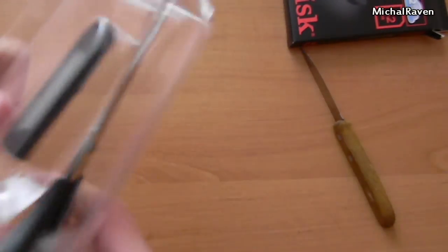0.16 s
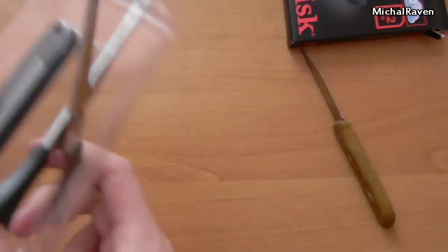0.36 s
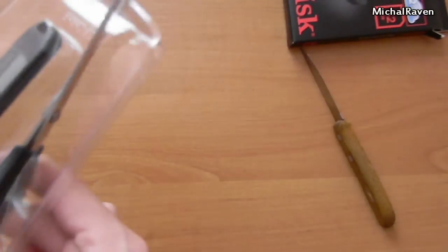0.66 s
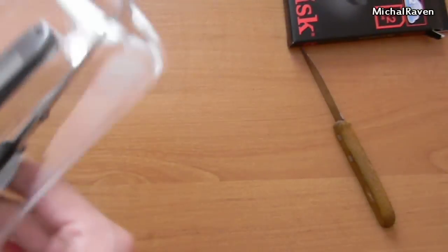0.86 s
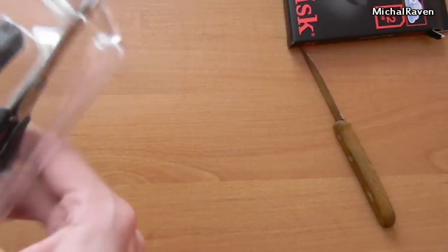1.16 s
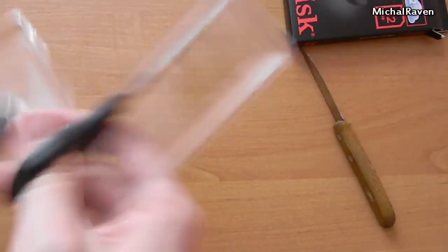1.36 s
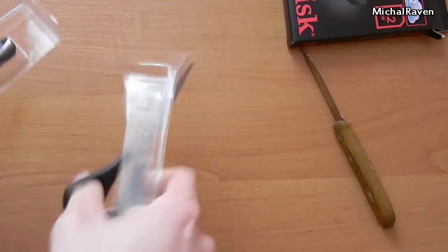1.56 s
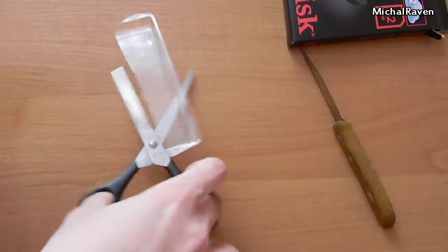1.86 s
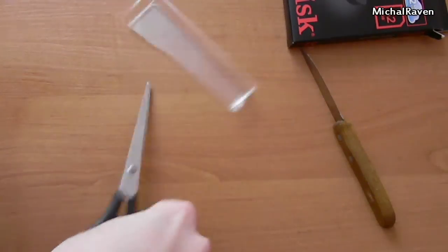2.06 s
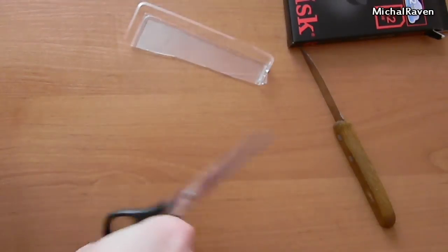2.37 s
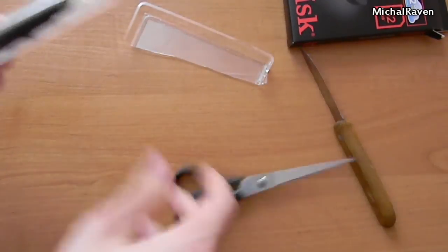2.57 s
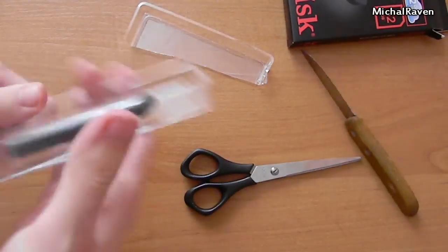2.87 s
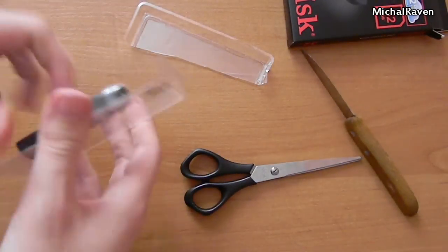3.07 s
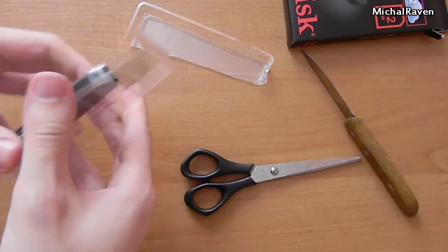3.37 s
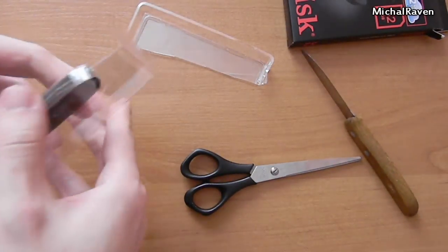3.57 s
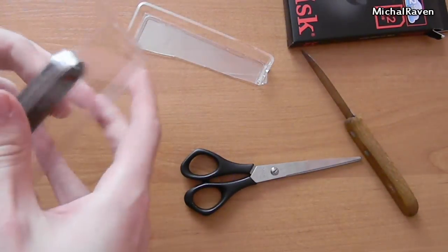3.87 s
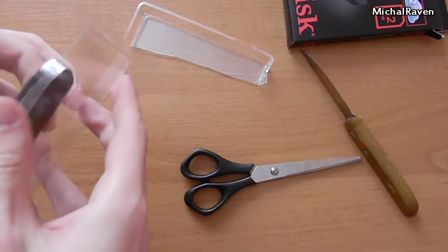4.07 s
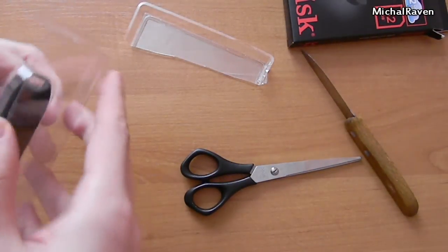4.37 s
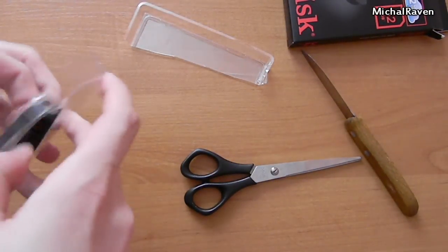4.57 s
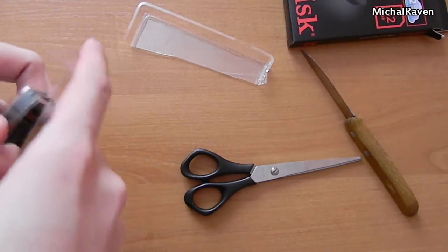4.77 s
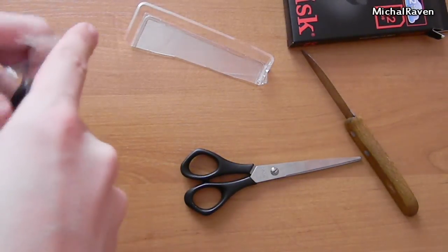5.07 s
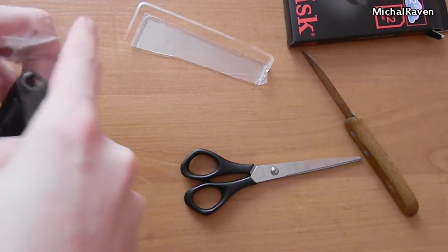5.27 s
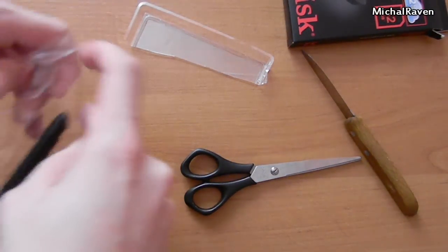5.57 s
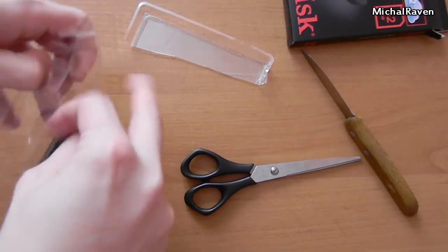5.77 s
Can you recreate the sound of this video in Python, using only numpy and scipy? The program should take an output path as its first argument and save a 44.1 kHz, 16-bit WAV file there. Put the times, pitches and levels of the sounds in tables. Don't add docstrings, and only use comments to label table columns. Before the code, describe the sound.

A close, slightly rough recording in a small room with short bright reflections and faint steady hiss. From 0 to 0.3 s stiff plastic film crackles and snaps under scissors, with hollow knocks of the shell. A quieter stretch of tiny ticks follows, with a small snap at 0.7 s. Cracks build at 1.1 s to a very loud, clipped seam break near 1.3 s, then more snaps around 1.6 to 1.7 s. From 1.8 to 2.3 s a light plastic offcut clatters and slides on the wooden table. At 2.4 s scissors drop, with woody knocks and metallic ringing, bouncing and rocking to rest by about 3 s. Faint creases and ticks fill 3 to 4.3 s. Hand prying then pops sharply at 4.5, 4.9 and 5.2 s, and a thick seam bursts loudly at 5.3 s, with another snap near 5.46 s. Small crackles fade to the end.

```python
import sys
import numpy as np
from scipy import signal
from scipy.fft import rfft, irfft, next_fast_len
from scipy.io import wavfile
from scipy.ndimage import uniform_filter1d, map_coordinates

SR = 44100
rng = np.random.default_rng(int(sys.argv[2]) if len(sys.argv) > 2 else 0)


def magnitude_from_level(level_db):
    exponent = np.asarray(level_db, float) / 20
    return 10 ** exponent


def transcribe(u):
    v = np.clip(np.atleast_2d(u).T, -1, 1)
    q = np.round(v * 32767).astype(np.int16)
    wavfile.write(sys.argv[1], SR, q)


N = 260631
SPAN, TAIL = 4096, 16384


def unit(x):
    return x / np.sqrt(np.mean(x ** 2) + 1e-20)


def along(points, hz):
    f, v = np.transpose(points)
    return np.interp(np.log(hz + 1), np.log(f + 1), v)


def curve(rows, column):
    rows = np.array(rows)
    return np.interp(np.arange(N) / SR, rows[:, 0], rows[:, column], left=-150, right=-150)


def colour(points):
    def response(hz):
        cepstrum = irfft(np.log(magnitude_from_level(along(points, hz))))
        half = len(cepstrum) // 2
        cepstrum[1:half] *= 2
        cepstrum[half + 1:] = 0
        return np.exp(rfft(cepstrum))
    return response


def mode(hz, centre_hz, width_hz):
    return 1j * hz * width_hz / (centre_hz ** 2 - hz ** 2 + 1j * hz * width_hz)


def modes(table):
    return lambda hz: sum((-1) ** k * magnitude_from_level(db) * mode(hz, centre, width)
                          for k, (centre, width, db) in enumerate(table))


def high_pass(hz, corner_hz):
    return 1j * hz / (corner_hz + 1j * hz)


def filtered(x, response):
    n = x.shape[-1]
    m = 2 * next_fast_len(n // 2 + 2048)
    return irfft(rfft(x, m) * response(np.fft.rfftfreq(m, 1 / SR)), m)[..., :n]


def peaked(rows, size):
    return rows / np.sqrt(2 * uniform_filter1d(rows ** 2, size).max(axis=1, keepdims=True))


def placed(rows, times):
    at = np.round(np.asarray(times) * SR).astype(int)[:, None] + np.arange(rows.shape[1])
    return np.bincount(at.ravel(), rows.ravel(), N + rows.shape[1] + SR)[:N]


def grains(rate, spread_db, clump_db):
    clump = magnitude_from_level(clump_db * unit(uniform_filter1d(rng.standard_normal(N), size=500)))
    draw = rng.random((2, N))
    present = draw[0] < rate / SR
    size = magnitude_from_level(-spread_db * np.log(draw[1] + 1e-3))
    return clump * present * size * rng.standard_normal(N)


# frequency in Hz, level in dB per Hz.
HUSH = [(24, -58.5), (40, -43.5), (118, -29), (167, -9.5), (290, 1), (556, -1.5), (2210, -13.5),
        (2440, -23), (4130, -13.5), (5050, -17.5), (12500, -25), (13800, -37), (16000, -64)]


def hush():
    air = magnitude_from_level(-63) * unit(filtered(rng.standard_normal(N), colour(HUSH)))
    whine_hz = 8075
    return air + magnitude_from_level(-94.5) * np.sin(2 * np.pi * whine_hz * np.arange(N) / SR)


# frequency in Hz, time to fall 60 dB in s.
ROOM = [(200, 0.067), (600, 0.21), (1500, 0.38), (4000, 0.25), (10000, 0.23)]
# frequency in Hz, level in dB.
WALLS = [(200, -8.5), (900, 5.5), (2300, 3), (3200, 4.5), (4500, 2), (5400, -1.5), (9000, -0.5),
         (14000, -4.5)]


def tails(count):
    hz, t, z = signal.stft(rng.standard_normal((count, TAIL)), SR, nperseg=256)
    z = z * magnitude_from_level(along(WALLS, hz)[:, None] - 60 * t / along(ROOM, hz)[:, None])
    tail = signal.istft(z, SR, nperseg=256)[1][:, :TAIL]
    first_wall_s = 0.0019
    tail = tail * np.clip(np.arange(TAIL) / SR / first_wall_s - 0.4, 0, 1)
    tail = tail * magnitude_from_level(0.84 * unit(uniform_filter1d(rng.standard_normal(tail.shape), size=130)))
    return tail / np.linalg.norm(tail, axis=1, keepdims=True)


# centre in seconds, level in dB, length in s.
PUFFS = [
    (.0, -44, 0.0087),
    (2.073, -71, 0.099),
    (2.264, -66, 0.042),
    (4.508, -59, 0.025),
    (5.716, -63, 0.1),
]


def puffs():
    s, db, long_s = np.transpose(PUFFS)[:, :, None]
    swell = (magnitude_from_level(db) * np.exp(-((np.arange(N) / SR - s) / long_s) ** 2)).sum(axis=0)
    centre_hz = 110
    return swell * unit(filtered(rng.standard_normal(N), lambda hz: mode(hz, centre_hz, 2 * centre_hz) ** 2))


def hits(s, ms, parts, wet_db, sharp, size=550):
    t = np.arange(SPAN) / SR
    draw = rng.standard_normal((len(s), 2, SPAN))
    spiky = draw[:, 0] * magnitude_from_level(2.4 * draw[:, 1])
    held = np.clip(ms - 1.4, 0.4, 24) / 1000
    onset = np.clip(t / (0.00017 + 0.14 * held), 0, 1)
    click = (t == 0) * np.ones_like(spiky)
    force = spiky * magnitude_from_level(-9 * t / held) * onset + sharp * click
    dry, power = 0, 0
    for db, response in parts:
        near = magnitude_from_level(db) * peaked(filtered(force, response), size=88)
        dry = dry + near
        power = power + np.abs(rfft(near, TAIL + SPAN)) ** 2
    smooth = np.sqrt(np.abs(uniform_filter1d(power, size)))
    sent = 0.25 * rfft(dry, TAIL + SPAN) + 0.9 * smooth
    wet = irfft(sent * rfft(tails(len(s)), TAIL + SPAN))[:, :TAIL]
    return placed(dry, s[:, 0]) + magnitude_from_level(wet_db) * placed(wet, s[:, 0])


# frequency in Hz, level in dB.
FILM = [(300, -50.5), (700, -17), (1500, -3), (2400, -4), (3300, 5), (4400, 8.5), (5500, -2), (7500, -7),
        (11000, -36), (16000, -52)]


def facet(ring_hz, ring_db, wide, body_db=0):
    def response(hz):
        ring = mode(hz, ring_hz, wide * ring_hz) * high_pass(hz, 0.13 * ring_hz)
        ring = ring / (1 + 1j * hz / (2.4 * ring_hz)) ** 2
        return magnitude_from_level(body_db) * colour(FILM)(hz) + magnitude_from_level(ring_db) * ring
    return response


# frequency in Hz, level in dB.
EDGE = [(300, -55), (4500, -22.5), (6500, 7), (9000, 4.5), (12000, -14.5), (15500, -22), (17000, -46)]


def edge(db):
    top_hz = np.maximum(30000 + 950 * db, 5200)
    return lambda hz: -colour(EDGE)(hz) / (1 + 1j * hz / top_hz) ** 3


# peak in seconds,
# crackle in dB, easing in dB per s, rumble over it in dB.
SWELLS = [(.01, -33, 149, -2), (0.198, -38.5, 167, 6), (.32, -50, 32, 1.5), (.76, -54, 55, -26),
          (.96, -32.5, 120, -10), (1.135, -27, 200, -15), (1.3, -17, 200, -10), (1.36, -66, 64, 20),
          (1.45, -32.5, 300, -31), (1.619, -46, 12, -9), (2.51, -17.5, 72, -13), (2.625, -18.5, 102, -6),
          (2.75, -48, 48, -24), (2.92, -31.5, 268, -21), (3.1, -66, 22, 16), (3.46, -65.5, 63, 11),
          (3.662, -44.5, 238.5, -22), (4.07, -50, 247, -9), (4.519, -29.5, 131, -0.5),
          (4.95, -42, 36.5, -3.5), (5.257, -25, 280, -15), (5.4, -46, 64, 16.5), (5.52, -32.5, 137.5, -67),
          (5.74, -61.5, 21, -8)]


def rustle():
    creasing = grains(rate=5000, spread_db=1.3, clump_db=2)
    crackle = unit(filtered(creasing, lambda hz: colour(FILM)(hz) + 0.027 * edge(-30)(hz)))
    rumble = unit(filtered(grains(rate=4300, spread_db=1.0, clump_db=3.2), colour(SHELL)))
    s, db, ease, rumble_db = np.transpose(SWELLS)[:, :, None]
    coarse = np.arange(0, N, 32)
    t = coarse / SR - s
    swell_db_per_s = 452
    surge = magnitude_from_level(db - np.maximum(ease * t, -swell_db_per_s * t))
    hold_db, hold_rumble_db = -67, 2.5
    bright = magnitude_from_level(hold_db) + surge.sum(axis=0)
    hollow = magnitude_from_level(hold_db + hold_rumble_db) + (magnitude_from_level(rumble_db) * surge).sum(axis=0)
    crackle = crackle * np.interp(np.arange(N), coarse, bright)
    rumble = rumble * np.interp(np.arange(N), coarse, hollow)
    return magnitude_from_level(-13.0) * crackle + magnitude_from_level(-10.5) * rumble


# time in seconds, pressure in dB.
SLIDE = [
    [(1.83, -42), (1.95, -51.5), (2.05, -47), (2.12, -45.5), (2.18, -40), (2.205, -50), (2.23, -46),
     (2.29, -57.5), (2.36, -72)],
    [(2.6, -56), (2.66, -40.5), (2.76, -34), (2.85, -37.5), (2.93, -34), (2.97, -47.5), (3.05, -62),
     (3.2, -61.5)],
]
# frequency in Hz, width in Hz, level in dB.
TABLE = [(317.7, 11, 5.5), (700, 45, 0.6), (775, 55, -0.6), (1090, 48, -6), (1550, 40, 0), (1640, 35, 4),
         (2430, 50, -1), (2600, 40, 2), (3600, 190, 2), (4200, 450, 1)]
# frequency in Hz, width in Hz, level in dB.
ROCKING = [(329.4, 20, 4), (720, 70, 0.6), (1633, 90, -11), (2384, 240, -12), (2830, 250, -6),
           (3830, 200, -2.5), (4350, 200, -8.5), (5700, 260, -14)]
HIGH_MODES_DB = [-1, 0]


def slide():
    rub = grains(rate=4900, spread_db=1.5, clump_db=2.5)
    sound = 0
    for pressure, body, high_db in zip(SLIDE, [TABLE, ROCKING], HIGH_MODES_DB):
        low = unit(filtered(rub, modes([m for m in body if m[0] <= 1000])))
        high = unit(filtered(rub, modes([m for m in body if m[0] > 1000])))
        sound = sound + magnitude_from_level(curve(pressure, column=1)) * (low + magnitude_from_level(high_db) * high)
    waver, waver_s = 0.022, 0.04
    drift = waver * unit(uniform_filter1d(rng.standard_normal(N), size=round(waver_s * SR)))
    lag = np.cumsum(drift)
    return map_coordinates(sound, [np.arange(N) + lag - uniform_filter1d(lag, size=9000)])


# start in seconds, peak in dB, table knock in dB, steel in dB, length in ms.
DROPS = [(2.3973, -6, -11.5, -10, 3.47), (2.478, -20, -11, -9.5, 7.2), (2.4874, -5, -10.5, -9.5, 4.04),
         (2.4931, -4, -6, -15, 5), (2.507, -14, -8, -16.5, 11.4), (2.6072, -19, -6, -11, 3.8),
         (2.612, -8, -8.5, -6.5, 4), (2.584, -27.5, -20, -0.5, 3), (2.626, -17, -17, -14.5, 4.87),
         (2.633, -18.5, -15, -16, 5), (2.6685, -19.5, -18, -19.5, 5), (2.6715, -18, -10, -3, 4.3),
         (2.7028, -12, -5.5, -5.5, 4)]
# frequency in Hz, width in Hz, level in dB.
BOUNCE = [(345, 45, 4), (680, 110, 0.6), (1700, 220, -12), (2500, 300, -11)]
# frequency in Hz, width in Hz, level in dB.
STEEL = [(5520, 200, 6.5), (7170, 480, 5), (7530, 310, 2.5), (8340, 200, -7.5), (9380, 190, -13),
         (10800, 250, -11.5), (12000, 380, -16)]


def rocks(last_s):
    first_s, shrink = 0.0555, 0.79
    return [(last_s + first_s * (1 - shrink ** (k + 1)) / (1 - shrink), -16 - 2.4 * k, -5.5, -3.5, 3.4)
            for k in range(7)]


def drops():
    first_s, last_s = DROPS[0][0], DROPS[-1][0]
    s, db, wood_db, steel_db, ms = np.transpose(DROPS + rocks(last_s))[:, :, None]
    ring_hz = np.where(s == first_s, 4900, 4300)
    wood_lag_s = 0.0035 * (s >= last_s)

    def wood(hz):
        top = modes(BOUNCE)(hz) * high_pass(hz, 220) + 0.03 * colour(SHELL)(hz)
        return top * np.exp(-2j * np.pi * hz * wood_lag_s)

    def steel(hz):
        return modes(STEEL)(hz) + 0.17 * colour(EDGE)(hz)

    def ring(hz):
        return facet(ring_hz, ring_db=14, wide=0.2, body_db=-3)(hz) - magnitude_from_level(9) * mode(hz, 3250, 450)

    parts = [(db - 5 * (s > last_s), ring), (db + wood_db, wood), (db + steel_db, steel)]
    return hits(s, ms, parts, wet_db=-7.5, sharp=1.4, size=90)


# frequency in Hz, level in dB.
SHELL = [(100, -47.5), (220, -14), (400, 6.5), (800, 2), (1300, -11.5), (2200, -26.5)]
# start in seconds, peak in dB, note in Hz, length in ms.
KNOCKS = [(0.0582, -28, 720, 8.6), (0.2105, -26.5, 430, 11.6), (0.2313, -21, 575, 13),
          (0.2425, -19, 610, 17), (0.308, -18, 430, 12), (0.4719, -42, 615, 10), (0.707, -30, 730, 5.5),
          (0.7056, -32, 1800, 3), (1.5882, -21, 1950, 2.5), (1.7045, -27, 1950, 3), (0.9358, -27, 700, 12),
          (0.9501, -19.5, 1240, 6.8), (1.1225, -18.5, 750, 7.6), (1.2137, -22, 1730, 3.5),
          (1.2852, -6, 480, 7.6), (1.2865, -7, 2080, 7), (1.4224, -32.5, 433, 24),
          (1.5886, -25.5, 567, 6.9), (1.705, -31, 990, 14), (1.841, -35, 364, 25),
          (3.6608, -41.5, 1523, 28), (4.354, -35.5, 1440, 17.5), (4.5032, -27, 1430, 2.4),
          (4.5341, -32, 553, 34), (4.8738, -20, 1016, 9.2), (5.0834, -23, 1200, 6), (5.089, -28, 700, 8),
          (5.233, -32.5, 600, 12), (5.3263, -5.5, 1603, 6), (4.061, -47, 1500, 13), (5.3275, -3, 267, 6.2),
          (5.387, -17, 613, 5.9), (5.4546, -22, 1100, 4.5), (5.4635, -9, 1030, 5.6), (5.2989, -31, 960, 9),
          (5.7887, -46.5, 950, 32)]


def knocks():
    s, db, note_hz, ms = np.transpose(KNOCKS)[:, :, None]

    def shell(hz):
        note = mode(hz, note_hz, 0.5 * note_hz) * high_pass(hz, 0.4 * note_hz)
        return 0.37 * colour(SHELL)(hz) + note
    return hits(s, 0.9 * ms, [(db, shell)], wet_db=-13.5, sharp=8.04, size=200)


# start in seconds, peak in dB, ring in Hz.
TICKS = [ (0.551, -55, 4600), (0.561, -57, 6500), (0.682, -56, 1650), (0.8571, -52, 4500),
         (0.8756, -53, 4600), (0.757, -49, 4090.0), (1.072, -52, 1320), (3.0612, -47, 4590),
         (3.2325, -47.5, 1740), (3.2326, -50.5, 4510), (3.533, -49.5, 4450), (3.542, -52, 3900),
         (3.645, -43, 4280), (3.713, -46, 5020), (3.74, -55, 5300), (4.0584, -46.5, 4900),
         (4.065, -50, 3500), (4.7246, -47.5, 1206), (4.734, -43.5, 3900), (4.812, -47.5, 5200),
         (5.7005, -50.5, 1055), (5.71, -52.5, 1420)]


def ticks():
    s, db, ring_hz = np.transpose(TICKS)[:, :, None]
    parts = [(db, facet(ring_hz, ring_db=13.5, wide=0.11)), (db - 13.0, edge(db))]
    return hits(s, 7.5 + 0 * s, parts, wet_db=-12.5, sharp=1.2)


def creasing(events, ms, edge_db):
    s, db = np.transpose(events)[:, :, None]
    ring_hz = 3740 * np.exp(0.035 * rng.standard_normal(s.shape))
    ring = facet(ring_hz, ring_db=3.0, wide=0.076)
    thud = lambda hz: colour(SHELL)(hz) + 0 * s
    parts = [(db, ring), (db + edge_db, edge(db + edge_db)), (db - 12, thud)]
    return hits(s, ms + 0 * s, parts, wet_db=-14, sharp=4.5)


# start in seconds, peak in dB.
PRICKS = [(0.103, -48), (0.17, -54), (.19, -43), (.4953, -53), (.6335, -68), (0.658, -50), (0.8285, -47),
          (1.0745, -50), (1.447, -41), (3.152, -56.5), (3.21, -58), (3.3438, -56.5), (3.4662, -55.5),
          (3.4997, -54), (3.669, -43), (3.7072, -49), (3.785, -55), (3.8414, -56), (4.0, -56), (4.077, -48),
          (4.137, -54), (4.726, -44), (4.677, -46), (1.63, -34), (4.338, -44.5), (4.577, -32.5),
          (4.588, -38), (4.622, -40.5), (4.7972, -48.5), (4.8444, -47.5), (5.105, -39), (5.118, -46),
          (5.207, -40), (5.2132, -34)]


def pricks():
    return creasing(PRICKS, ms=2.2, edge_db=-5.5)


# start in seconds, peak in dB.
CREASES = [(.2827, -23), (.4699, -43.5), (.6975, -40), (1.0581, -34), (1.4072, -31), (1.4113, -29),
           (1.425, -25), (1.5287, -42), (1.5449, -36.5), (1.5537, -35.5), (1.5681, -38), (1.2128, -24),
           (1.2775, -21), (1.984, -34), (2.0003, -28.5), (2.0681, -27.5), (2.3442, -38.5), (3.0487, -40),
           (3.1401, -37.5), (4.4688, -34), (4.9954, -36), (5.0664, -39.5), (5.0783, -33), (5.193, -41),
           (5.2193, -31), (5.607, -40.5), (5.7273, -38.5), (5.8794, -36.5)]


def creases():
    return creasing(CREASES, ms=4.76, edge_db=-11.5)


# start in seconds, level in
# dB, pitch in Hz, loss in dB per cycle, swell in cycles.
THUMPS = [(5.3284, 8, 274, 15.5, 0.15), (1.1212, 7, 3150, 2, 4), (1.588, -2, 3230, 3, 1.2),
          (4.5022, -32, 60, 40, .1), (1.2836, 5, 3400, 1.8, 1.5), (1.2865, -5, 480, 5.5, .8),
          (2.6115, 3, 4380, 1.8, 3), (5.3275, 1, 1550, 2.5, 1.2), (.2425, -13, 4200, 3.5, 1.1),
          (.0302, -24, 1950, 4, 1.1), (.0585, -28, 1750, 2.5, 1.2), (.0005, -27, 520, 6, .4),
          (2.0428, -22, 4600, 1.5, 2.2), (4.4845, -38, 520, 3, .8), (.7053, -19, 3900, 1.5, 1.5),
          (2.494, -1.5, 3200, 1.2, 3), (1.839, -10, 3250, 1.2, 2.2), (1.2875, -6, 1550, 1.5, 1.5),
          (4.5024, -1.5, 3700, 2.5, 1.2), (5.4642, -9, 2250, 2.2, 1.5), (1.9213, -19, 3200, 1.5, 1.2),
          (2.4935, -26, 60, 30, .1), (5.3242, 4.5, 2600, 2.8, 2.1), (2.4935, -5, 419, 6, 0.62),
          (5.0838, -16, 1150, 2.5, 1.5), (1.2875, -7, 270, 10, .4)]


def thumps():
    s, db, hz, loss_db, swell = np.transpose(THUMPS)[:, :, None]
    turns = hz * np.arange(SPAN) / SR
    ring = magnitude_from_level(db - loss_db * turns) * (1 - np.exp(-turns / swell)) * np.sin(2 * np.pi * turns)
    return placed(filtered(ring, lambda f: high_pass(f, 0.24 * hz) ** 2), s[:, 0])


def snaps(events, wet_db, body_db=0, wide=0.059):
    s, db, ring_hz, edge_db, ms = np.transpose(events)[:, :, None]
    ring = facet(ring_hz, ring_db=11.0, wide=wide, body_db=body_db)
    parts = [(db, ring), (db + edge_db, edge(db + edge_db))]
    return hits(s, ms, parts, wet_db, sharp=2.9)


# start in seconds, peak in dB, ring in Hz, bright edge in dB, length in ms.
OFFCUT = [(1.8174, -33, 3600, -10, 3.9), (1.8316, -19, 2050, -12, 2.6), (1.8388, -14, 4200, -7, 2.9),
          (1.8418, -14.5, 4200, -9, 3.2), (1.9213, -22, 4200, -7.5, 4), (1.9265, -25, 4200, -14, 4),
          (1.9335, -26.5, 3400, -6, 5.9), (1.968, -25.5, 3700, -16, 3.5), (2.0135, -12.5, 3870, -11, 3),
          (2.0428, -21, 6900, -4, 2.4), (2.0811, -24, 3950, -20, 5), (2.2156, -39, 3950, -8, 44),
          (2.3562, -36.5, 5130, -23.5, 5.4), (2.3769, -51, 6890.0, 16, 1.7)]


def offcut():
    return snaps(OFFCUT, wet_db=-10.5, body_db=-7, wide=0.13)


# start in seconds, peak in dB, ring in Hz, bright edge in dB, length in ms.
PRISE = [(3.1057, -36.5, 5450, -4.5, 4.4), (3.1216, -38.5, 12570, -12, 1.7), (3.2662, -40, 4330, 0, 2.6),
         (3.6523, -40, 4370, -19, 20), (4.2559, -40.5, 3450, -7, 3.6), (4.3216, -24.5, 4470, -8, 4),
         (4.3528, -15, 5320, -6, 2.9), (4.5023, -4.5, 4900, -30.5, 2.4), (4.5278, -15, 3600, -16.5, 2.4),
         (4.5378, -17, 4390.0, -19.5, 1.4), (4.5553, -17, 4300, -14, 2.2), (4.712, -35, 4310.0, -8.5, 1.5),
         (4.8732, -5.5, 4670, -4.5, 3.17), (4.9318, -20.5, 4340, -26, 3), (5.25, -31, 3210, -25, 30),
         (5.083, -34, 4200, -14, 11.6), (5.225, -22.5, 3200, -33.5, 2.2), (5.2322, -7.5, 4230, -12, 2.04),
         (5.3245, 0, 4300, -9, 5.2), (5.386, -9.5, 3770, -20, 3.6), (5.4122, -22, 3740, -17.5, 5.5),
         (5.4608, -13.5, 3790, -18, 2.9), (5.2355, -19, 4030, -16, 2.5), (5.2328, -16, 2950, -30, 3),
         (5.464, -5, 4510, -12, 4.24), (5.79, -43.5, 1014, -14, 10), (5.8323, -26.5, 4140, -5, 2.35), ]


def prising():
    return snaps(PRISE, wet_db=-11)


# start in seconds, peak in dB, ring in Hz, bright edge in dB, length in ms.
SEAMS = [
    (1.2822, -17, 4500, -8, 3.7),
    (1.2842, -5, 3000, -24, 7.5),
    (1.2866, 1, 3386, -2.5, 2.8),
    (5.3272, -6.5, 6880, 4, 2.7),
    (1.2858, -7, 13000, -10, 3.4),
    (5.3262, -7, 13000, -10, 3.2),
]


def seams():
    return snaps(SEAMS, wet_db=-17.5, wide=0.15)


# start in seconds, peak in dB, ring in Hz, bright edge in dB, length in ms.
CUT = [(0.0301, -18.5, 3340, -24, 3.04), (0.038, -27, 3150, -28, 1.3), (0.199, -25.5, 4030, -12, 14.6),
       (0.2316, -20, 3800, -28, 10), (0.242, -25, 3900, -6, 15), (0.2472, -16, 4850, -29, 3.6),
       (0.2746, -24, 4250, -22, 5.7), (0.3015, -29, 3900, -15, 5.8), (0.3035, -13, 3730, -9.5, 3.8),
       (0.3085, -17.5, 3700, -20, 2.2), (0.3118, -18, 3860, -25, 2.4), (0.2555, -20, 4500, -15, 2.2),
       (0.2135, -31, 4000, -15, 4.6), (0.7052, -28, 3880, -17, 2.15), (0.9253, -36, 2998, -3, 12),
       (0.9456, -20.5, 4844, -19, 13), (1.1213, -7.5, 4380, -7, 3.1), (1.2045, -24, 5800, -8.5, 2.8),
       (1.2174, -17.5, 3313, -6.5, 4), (1.2659, -33, 4350.0, -9.5, 5.1), (1.2885, -3.5, 3300, -7, 4.2),
       (1.4199, -21, 5100, -9, 2.5), (1.4831, -37.5, 5500, 2, 3), (1.5878, -10, 3300, -14, 1.3),
       (1.6008, -22, 3300, -8, 1.8), (1.616, -22, 3400, -9, 2), (1.6218, -27, 3300, -12, 1.8),
       (1.6915, -40, 3700, -14, 4), (1.5915, -22, 4600, -12, 2), (1.704, -15, 3260, -10.5, 3.9),
       (1.7776, -25, 3140, -5.5, 1.6)]


def cutting():
    return snaps(CUT, wet_db=-12.5)


def scene():
    soft = rustle() + slide()
    rings = thumps()
    echo = signal.fftconvolve(soft + 0.3 * rings, tails(count=1)[0])[:N]
    background = hush() + puffs() + magnitude_from_level(-16.0) * echo
    film = knocks() + ticks() + pricks() + creases() + prising() + seams() + cutting()
    return (background + soft + offcut() + drops() + rings + film)[None]


def band_limit(x):
    return signal.sosfilt(signal.butter(12, 16520, fs=SR, output="sos"), x)


def record(dry):
    x = filtered(dry, lambda hz: high_pass(hz, 90) ** 2)
    x = x / (1 + np.abs(x / 0.97) ** 16) ** (1 / 16)
    x = filtered(x, lambda hz: 1 / (1 + (hz / 16200) ** 60))
    top = filtered(x, lambda hz: 1 - 1 / (1 + (hz / 13200) ** 60))
    loud = np.abs(uniform_filter1d(top ** 2, size=700)) > magnitude_from_level(-142)
    shut = 1 - uniform_filter1d(loud * 1.0, size=300)
    return band_limit(x - shut * top)


dry = scene()
out = record(dry)
transcribe(out)
```